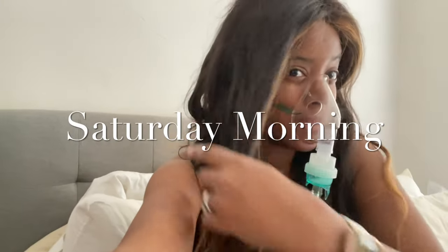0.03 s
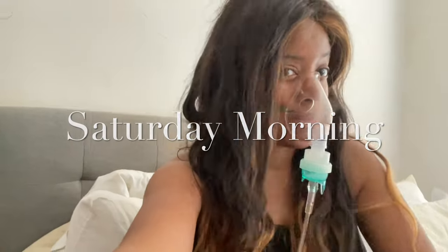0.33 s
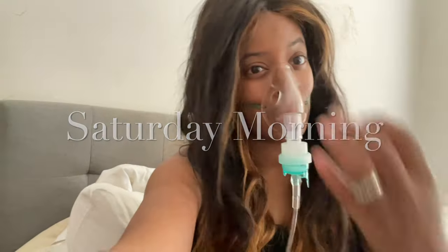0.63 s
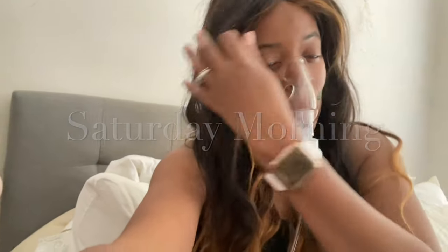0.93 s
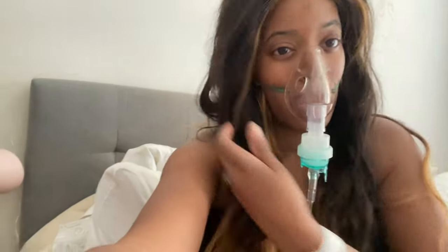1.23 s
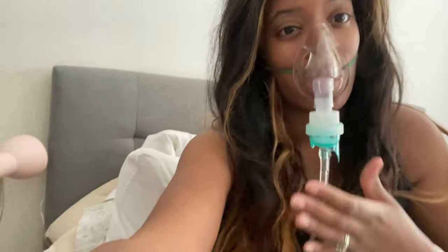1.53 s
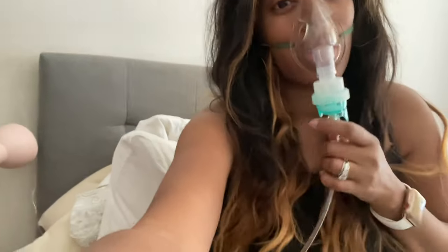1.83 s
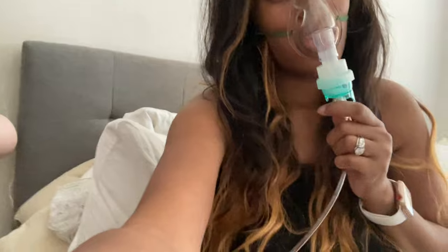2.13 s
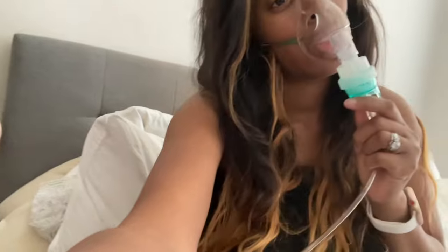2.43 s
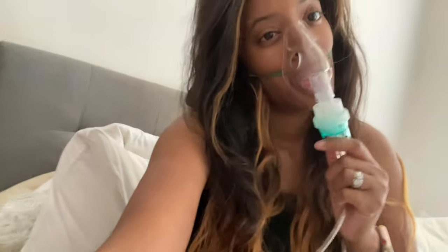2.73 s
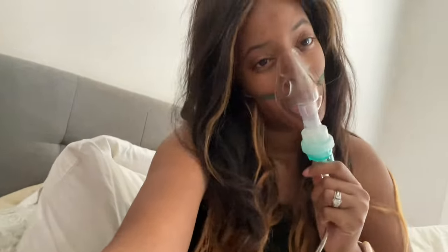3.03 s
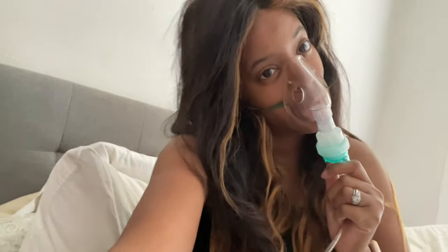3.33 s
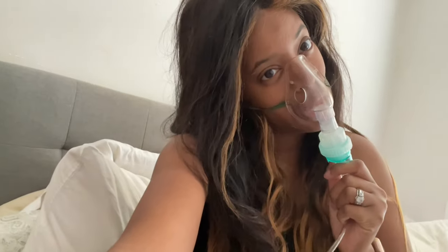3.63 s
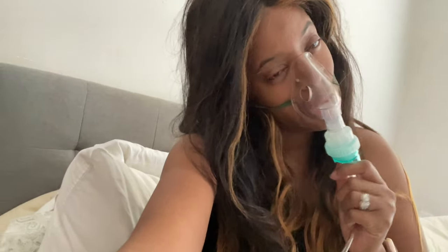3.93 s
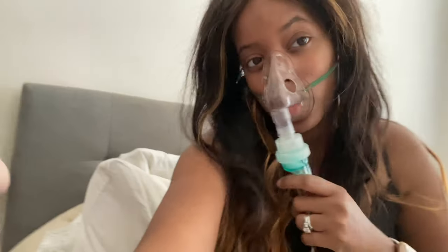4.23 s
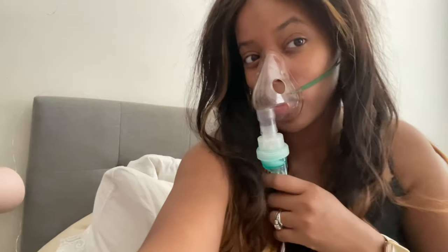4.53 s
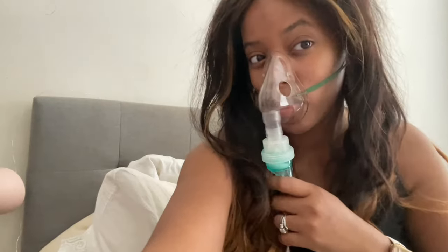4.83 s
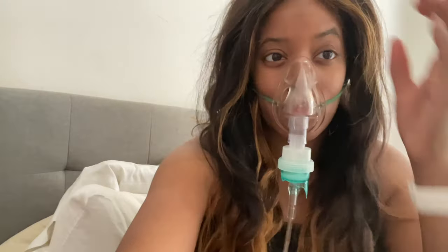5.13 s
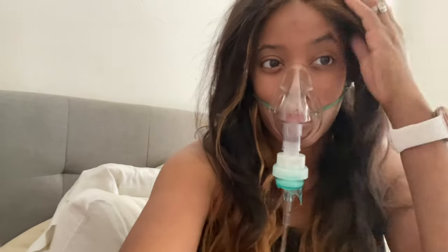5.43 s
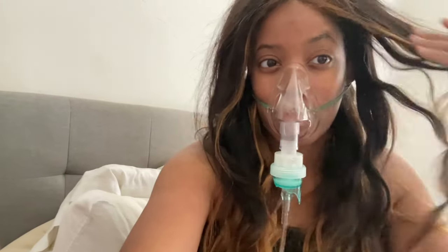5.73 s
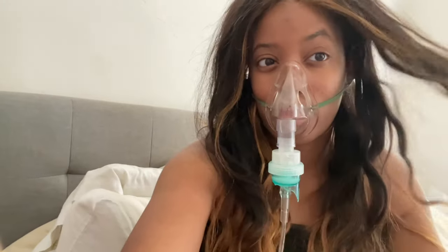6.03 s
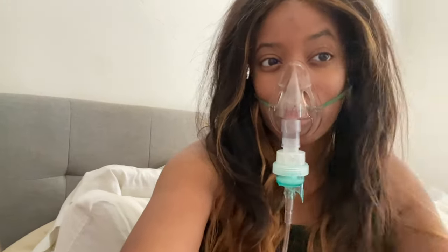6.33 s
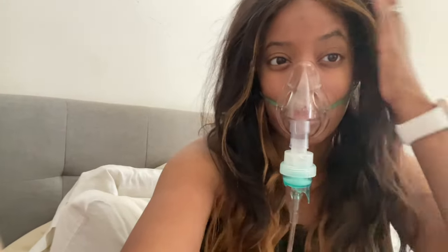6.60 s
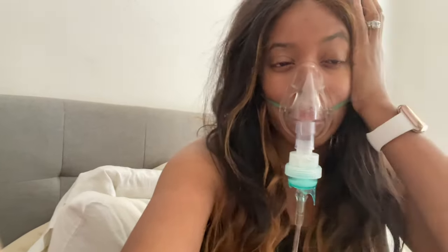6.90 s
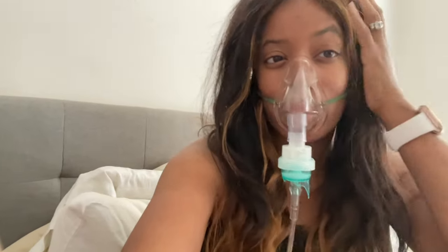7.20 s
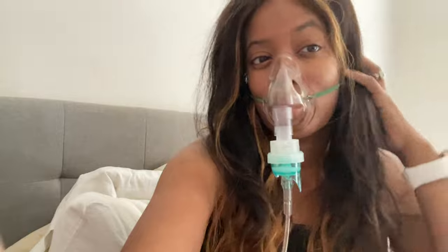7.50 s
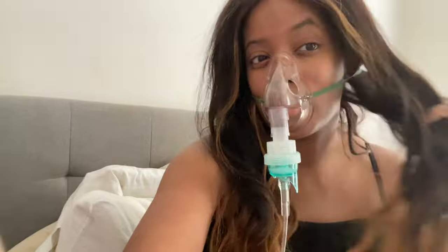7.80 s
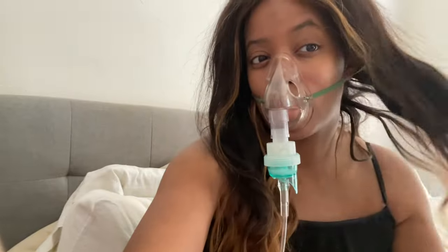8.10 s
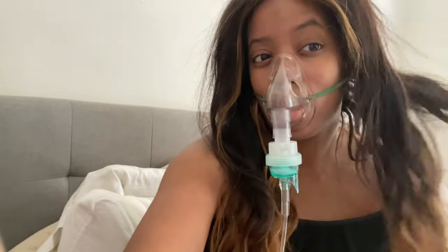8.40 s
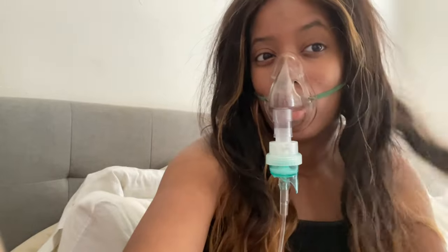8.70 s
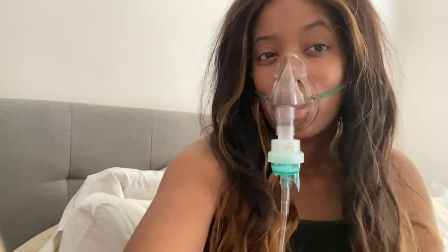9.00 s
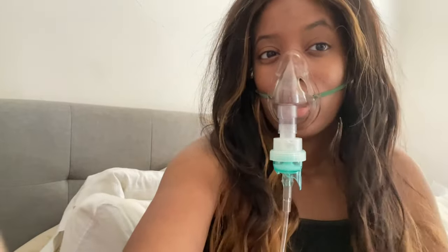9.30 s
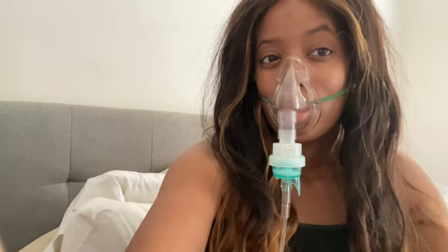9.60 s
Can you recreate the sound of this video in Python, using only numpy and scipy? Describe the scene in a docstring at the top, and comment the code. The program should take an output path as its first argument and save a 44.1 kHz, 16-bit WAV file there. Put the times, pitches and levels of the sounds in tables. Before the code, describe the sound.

Close up in a quiet bedroom, a nebulizer compressor hums with a rapid beat, topped by a high, fluttering whistle and a fine hiss of mist. The hiss swells as the medicine cup is gripped and tilted, and the liquid gives three short sputters. After a split-second drop in level midway, the sound returns with a slightly different colour, and the finest sizzle gradually softens while the motor keeps running.

```python
"""In a quiet bedroom a nebulizer runs. Its piston compressor drones and beats against the mains hum,
and its air whistles in a warble once a stroke. The pulsing jet hisses through the medicine cup under
the mask, tearing liquid into spray; the cup resonates louder and lower while it is held and tilted,
and sputters three times. A phone with two microphone ports is held close by; halfway through, the
level dips briefly, and the machine is then heard from a new position."""
import sys
import numpy as np
from scipy import signal
from scipy.fft import rfft, irfft, next_fast_len
from scipy.io import wavfile
from scipy.ndimage import uniform_filter1d, map_coordinates

SR = 44100
rng = np.random.default_rng(int(sys.argv[2]) if len(sys.argv) > 2 else 0)


def output_pcm(signal):
    """Save a mono or channel-first signal as 16-bit PCM at the path in sys.argv[1].

    Samples are clipped to [-1, 1] before scaling.
    """
    pcm = np.clip(np.atleast_2d(signal).T, -1, 1) * 32767
    wavfile.write(sys.argv[1], SR, np.round(pcm).astype(np.int16))


N = 429975
FRAME, HOP = 1024, 512
TIME = np.arange(N) / SR
FRAME_TIME = np.arange(N // HOP + 2) * HOP / SR
FRAME_HZ = np.arange(FRAME // 2 + 1)[:, None] * SR / FRAME
STROKE_HZ, MAINS_HZ = 54.39, 60
GRASP_S, DIP_S = 1.81, 5.089


def from_db(db):
    """Amplitude ratio of a level in decibels."""
    return 10 ** (np.asarray(db) / 20)

def in_time(rows, time=TIME):
    """Linear interpolation of each column against the first, t/s."""
    times, *columns = np.transpose(rows)
    return [np.interp(time, times, column) for column in columns]

def at_hz(points, hz):
    """Interpolation of a spectrum on a logarithmic frequency axis."""
    known_hz, values = np.transpose(points)
    return np.interp(np.log(np.maximum(hz, 1)), np.log(known_hz), values)

def drift(rate):
    """Smooth random fluctuation of about unit spread, with `rate` new values a second."""
    return map_coordinates(rng.standard_normal(4096), [TIME * rate], order=2, mode="wrap")

def swell(t, spread):
    """Gaussian envelope of height 1, centred on t."""
    return np.exp(-np.minimum(((TIME - t) / spread) ** 2 / 2, 50))

def surge(turns, peak_at, sharpness):
    """Amplitude modulation of rms 1, peaking at a given fraction of each stroke."""
    power = np.exp(sharpness * np.cos(2 * np.pi * (turns - peak_at)))
    return np.sqrt(power / power.mean())

def resonances(modes):
    """Response of modes (f/Hz, width/Hz, level/dB) that add in power."""
    return np.sqrt(sum(from_db(db) ** 2 / (1 + 2 * ((FRAME_HZ - hz) / width) ** 2) ** 2
                       for hz, width, db in modes))

# Coherence of the sound field at the two ports: f/Hz, correlation (0-1)
COHERENCE = [(100, 0.75), (280, 0.66), (430, 0.21), (680, 0.82), (950, 0.81), (2200, 0.56), (3400, 0.52),
             (5000, 0.61), (7000, 0.9), (9400, 1), (11400, 1), (15500, 1)]
def turbulence(gain):
    """Partially coherent stereo noise of rms 1, filtered by a gain over frequency and frames."""
    mid, side = rng.standard_normal((2, len(FRAME_HZ), 2 * len(FRAME_TIME))).view(complex)
    alike = np.clip(at_hz(COHERENCE, FRAME_HZ), -1, 1)
    mid, side = gain * np.sqrt(1 + alike) * mid, gain * np.sqrt(1 - alike) * side
    grains = irfft(np.array([(mid + side).T, (mid - side).T])) * signal.get_window("cosine", FRAME)
    noise = (grains[:, 1:, :HOP] + grains[:, :-1, HOP:]).reshape(2, -1)[:, :N]
    return noise / np.std(noise)

def noise_band(hz, width_hz):
    """Random excitation of a single resonance; rms 1."""
    return turbulence(resonances([(hz, width_hz, 0)]))

# Lean of head and cup: t/s, tilt (0-1)
CUP_TILT = [(1.8, 0), (2.5, 0.76), (3.3, 0.93), (4.0, 0.81), (4.4, 0.49), (5.05, 0.31), (5.13, 0.02)]
def posture(time=TIME):
    """Source geometry, each 0-1: the cup is tilted, is held, hangs free in its new position."""
    tilt, = in_time(CUP_TILT, time)
    grasped = np.clip((time - GRASP_S) / 0.4, 0, 1)
    moved = np.clip((time - DIP_S) / 0.02, 0, 1)
    return tilt, grasped * (1 - moved), moved


# Piston harmonics: f/STROKE_HZ, level/dB
PISTON_HARMONICS = [(2, -41.5), (3, -46), (4, -56), (5, -68), (6, -62.5), (7, -62), (8, -62), (9, -70),
                    (10, -66), (11, -63), (12, -60.5), (13, -58.5)]
# Magnetic hum of the motor: f/MAINS_HZ, level/dB
HUM_HARMONICS = [(2, -42), (4, -59.5)]
def compressor(turns):
    """Beats: the motor slips behind the mains, so piston harmonic 2 beats with the hum at 11 Hz."""
    tilt, _, _ = posture()
    lean_db = 4 * tilt
    thump = -from_db(-48.5 + lean_db) * np.cos(2 * np.pi * turns)
    piston = sum(from_db(db) * np.sin(2 * np.pi * (k * turns + rng.random()))
                 for k, db in PISTON_HARMONICS)
    hum = sum(from_db(db) * np.cos(2 * np.pi * k * MAINS_HZ * TIME) for k, db in HUM_HARMONICS)
    nearness = from_db(0.31 * (lean_db - np.median(lean_db)) + 0.26 * drift(11))
    return np.sqrt(2) * (thump + (piston + hum) * nearness)

# Casing resonances: f/Hz, width/Hz, relative level/dB
CASING_MODES = [(672, 50, 1), (754, 64, -6.5)]
# Casing vibration: t/s, relative level/dB
CASING_ENVELOPE = [(0.1, -43), (1.0, -46), (1.5, -40), (2.1, -44), (3.4, -43), (4.0, -42.5), (4.7, -39),
                   (5.3, -42.5), (6.1, -37.5), (6.6, -39.5), (7.7, -37), (8.6, -39), (9.1, -36.5),
                   (9.7, -39.5)]
def casing(mode_hz=658, waver_hz=8):
    """Forced vibration: the shaken plastic drones in one narrow, wavering mode over a broader boom."""
    phase = 2 * np.pi * np.cumsum(mode_hz + waver_hz * drift(45)) / SR
    mode = np.sqrt(2) * from_db(-6.5 + 3 * drift(22)) * np.cos(phase)
    boom = from_db(-2.5) * turbulence(resonances(CASING_MODES))
    _, _, moved = posture()
    focus = from_db(0.96 * moved)  # the mode stands out more in the new position
    return from_db(in_time(CASING_ENVELOPE)[0]) * (mode * focus + boom / focus)

# Lower pitch of the whistle: t/s, f/Hz
LOW_PITCH = [(0.1, 1997), (1.1, 1899), (1.6, 1984), (1.9, 1923), (2.4, 2038), (3.9, 2012), (4.4, 1958),
             (5.9, 1933), (6.7, 1816), (8.2, 1821), (8.6, 1892), (9.7, 1830)]
def whistle_regimes(time=TIME):
    """Two regimes of oscillation: lower pitch, upper pitch, and the tonal share of their power."""
    tilt, _, moved = posture(time)
    low_hz, = in_time(LOW_PITCH, time)
    high_hz = 2230 - 20 * tilt + 109.5 * moved
    return low_hz, high_hz, 0.87 + 0.03 * tilt

# Whistle at low flow and at high flow: t/s, relative level/dB
LOW_FLOW = [(0.02, -37), (0.17, -32.5), (0.5, -40.5), (0.85, -37), (1.03, -34.5), (1.2, -40), (1.48, -40),
            (1.6, -35.5), (1.73, -43), (1.92, -32.5), (2.12, -38.5), (2.3, -34), (2.6, -36.5),
            (3.89, -37.5), (4.2, -39), (4.6, -40.5), (4.73, -48), (4.84, -36), (5.08, -43), (5.13, -35.5),
            (5.9, -34), (6.5, -37.5), (8.15, -40), (8.45, -40.5), (9.25, -42.5), (9.65, -38)]
HIGH_FLOW = [(0.05, -44), (0.48, -37.5), (1.39, -45), (4.05, -38), (4.19, -44.5), (5.02, -42), (5.08, -41),
             (5.16, -37), (8.17, -40.5), (9.65, -39), (9.7, -41)]
def whistle(turns, valve_at=0.31, drop_at=0.69, shut_turns=0.029):
    """Flow-driven tone: each stroke it sags with the flow, drops to a low chirp and is valved off."""
    low_hz, high_hz, tonal = whistle_regimes()
    _, _, moved = posture()
    part = (turns - valve_at) % 1  # fraction of a turn since the valve shut
    sag_hz = 260.5 * (1 - 0.5 * moved)
    upper_hz = high_hz + sag_hz * (0.5 - part)
    high = (1 + np.tanh(7 * (drop_at - part + 0.13 * drift(130)))) / 2  # 1 on the upper pitch
    hz = low_hz + (upper_hz - low_hz) * high + 38 * drift(60) + 55 * drift(700)
    low_db = in_time(LOW_FLOW)[0] + 3.15 + 1.5 * drift(45)
    high_db = in_time(HIGH_FLOW)[0] + 1.5
    level_db = low_db * (1 - high) + high_db * high + 0.5 * drift(290)
    opening = 1 - np.exp(-(np.minimum(part, 1 - part) / shut_turns) ** 2)
    strength = uniform_filter1d(from_db(level_db) * opening, size=44)
    return np.sqrt(2 * tonal) * strength * np.sin(2 * np.pi * np.cumsum(hz) / SR)

def rasp(turns):
    """Narrow-band noise: what the whistle loses in clear tone is hoarseness at its two pitches."""
    low_hz, high_hz, _ = whistle_regimes(FRAME_TIME)
    _, _, tonal = whistle_regimes()
    low = noise_band(low_hz, width_hz=170) * surge(turns, peak_at=0.24, sharpness=1.0)
    high = noise_band(high_hz, width_hz=330) * surge(turns, peak_at=0.17, sharpness=0.067)
    low_db, high_db = in_time(LOW_FLOW)[0] + 2.5, in_time(HIGH_FLOW)[0] + 5.5
    return np.sqrt(1 - tonal) * (from_db(low_db) * low + from_db(high_db) * high)

# Hollow tone, strongest in the new position: t/s, level/dB
HOLLOW_ENVELOPE = [(0.1, -49), (1.1, -45), (2.2, -54), (5.08, -54), (5.15, -44), (7.1, -43), (7.4, -40.5),
                   (8.15, -41.5), (8.45, -50), (9.7, -47)]
def hollow_tone(centre_hz=1805, flutter_db=3.5):
    """Random modulation of frequency and amplitude: a wavering tone just below the whistle."""
    hz = centre_hz + 38 * drift(80) + 60 * drift(600)
    level_db = in_time(HOLLOW_ENVELOPE)[0] + flutter_db * drift(90)
    return np.sqrt(2) * from_db(level_db) * np.sin(2 * np.pi * np.cumsum(hz) / SR)

# Resonances of the air tube: f/Hz, width/Hz, relative level/dB
TUBE_MODES = [(2536, 200, -6.5), (2956, 81, 0.5), (3140, 13, -18), (3180, 410, -13)]
# Ringing of the tube: t/s, relative level/dB
TUBE_ENVELOPE = [(0.1, -48), (1.3, -49), (1.55, -51.5), (2.1, -49.5), (2.35, -52.5), (2.95, -45),
                 (3.2, -44.5), (3.67, -40), (4.15, -43.5), (5.05, -47.5), (5.2, -42.5), (5.8, -47),
                 (6.45, -43.5), (7.0, -46), (9.7, -45)]
def air_line(turns, flutter_db=2.5):
    """Pipe resonance: each stroke sucks a puff through the intake; the delivery rings the tube."""
    puff = noise_band(1500, width_hz=480) * surge(turns, peak_at=0.3, sharpness=0.56)
    tube_db = in_time(TUBE_ENVELOPE)[0] + 0.65 + flutter_db * drift(24)
    tube = turbulence(resonances(TUBE_MODES)) * surge(turns, peak_at=0.33, sharpness=0.19)
    return from_db(-46.5) * puff + from_db(tube_db) * tube

# Lowest resonance f0 of the cup, which falls as it is gripped and tilted: t/s, f/Hz
CUP_FUNDAMENTAL = [(1.3, 5320), (1.75, 5230), (2.05, 5160), (2.38, 5160), (2.48, 5080), (4.15, 5094),
                   (4.4, 5155), (5.06, 5240), (5.12, 5320), (8.35, 5323), (8.9, 5510), (9.4, 5630),
                   (9.7, 5570)]
# That mode on its broad skirt, then its overtone: f/f0, width/Hz, relative level/dB
CUP_MODE = [(1.0, 186, -0.5), (0.95, 440, -11.5)]
OVERTONE_MODE = [(2.049, 422, 0)]
def cup_ring(sputter_sag_hz=110, flicker_db=1.85):
    """Cavity resonance: tilt broadens the cup's ring; sputters excite it and briefly lower it."""
    tilt, held, moved = posture()
    excited = sum(swell(t, spread) for t, _, spread, _ in SPUTTER_EVENTS)
    ring_db = -48.98 + 8.5 * held + 3.5 * tilt + 4 * excited
    ring_db += moved * (3.5 - 0.5 * (TIME - DIP_S))  # slow fade in the new position
    spray_db, _ = mist_levels()
    overtone_db = spray_db - 13.98 + 11.5 * held  # the spray excites the overtone
    sag = np.interp(FRAME_TIME, TIME, sum(swell(t, 0.033) for t, *_ in SPUTTER_EVENTS))
    cup_hz = in_time(CUP_FUNDAMENTAL, FRAME_TIME)[0] - sputter_sag_hz * sag
    broadening = 1 + 0.12 * posture(FRAME_TIME)[0] ** 2
    ring = 0
    for modes, level_db in ((CUP_MODE, ring_db), (OVERTONE_MODE, overtone_db)):
        response = resonances([(k * cup_hz, width * broadening, db) for k, width, db in modes])
        ring += from_db(level_db + flicker_db * drift(40)) * turbulence(response)
    return ring

# Second resonance of the cup: t/s, f/Hz, level/dB
SECOND_MODE = [(0.1, 6020, -52), (1.8, 5750, -50.5), (2.45, 6200, -47), (2.75, 6300, -50),
               (3.1, 6100, -43.5), (3.6, 6100, -44), (4.1, 6030, -41), (5.05, 5940, -42.5),
               (5.15, 5900, -48), (6.3, 5820, -47), (6.9, 5853, -42), (7.6, 5770, -53.5), (9.7, 5850, -60)]
def second_ring(wander_hz):
    """Noise-driven resonance: a narrow, gliding band above the cup's lowest mode."""
    hz, _ = in_time(SECOND_MODE, FRAME_TIME)
    _, level_db = in_time(SECOND_MODE)
    return from_db(level_db) * noise_band(hz + wander_hz, width_hz=190)

# Centre fc of the jet's hiss: t/s, f/Hz
JET_CENTRE = [(0.3, 7240), (1.3, 6950), (3.3, 7000), (8.0, 6990), (8.8, 7020)]
# Its twin peaks: f/fc, width/Hz, relative level/dB
JET_PEAKS = [(0.966, 316, -0.5), (1.026, 292, 0.5)]
def jet(wander_hz, fade_db_per_s=0.9):
    """Turbulent jet noise: louder while the cup is held, slowly fading in the new position."""
    _, held, moved = posture()
    level_db = -48.5 + 4.5 * held + moved * (7 - fade_db_per_s * (TIME - DIP_S))
    centre_hz, = in_time(JET_CENTRE, FRAME_TIME)
    peaks = [(k * centre_hz + wander_hz, width, db) for k, width, db in JET_PEAKS]
    return from_db(level_db) * turbulence(resonances(peaks))

# Upper resonances of the mask: f/Hz, width/Hz, relative level/dB
MASK_MODES = [(8660, 320, 0), (10050, 240, -6)]
def mask_ring(held_drop_hz=620):
    """Higher modes: the mask rings lower and louder when held, louder still in the new position."""
    _, held, moved = posture()
    drop_hz = held_drop_hz * posture(FRAME_TIME)[1]
    modes = [(hz - drop_hz, width, db) for hz, width, db in MASK_MODES]
    return from_db(-58 + 4 * held + 7 * moved) * turbulence(resonances(modes))

def cup_hiss(turns):
    """Pulsating flow: the hiss through cup and mask swells with each delivery of air."""
    wander_hz = 35 * np.interp(FRAME_TIME, TIME, drift(6.4))
    hiss = cup_ring() + second_ring(wander_hz) + jet(wander_hz) + mask_ring()
    return hiss * surge(turns, peak_at=0.58, sharpness=0.23)

# Cooling air and bedroom background: f/Hz, relative spectrum level/dB
AIR_SPECTRUM = [(20, -36), (38, -1), (70, -10), (100, -1), (150, -5.5), (215, 2.5), (300, -5), (450, -6),
                (580, -0.5), (950, -16.5), (1400, -11), (3500, -18.5), (4200, -20.5), (6000, -13),
                (16000, -26.5)]
def cooling_air(level_db=-44):
    """Broadband flow noise: a steady rush, strongest in the bass."""
    return from_db(level_db) * turbulence(from_db(at_hz(AIR_SPECTRUM, FRAME_HZ)))

# Notch in the spray, moving with the head: t/s, f/Hz, depth/dB
SPRAY_NOTCH = [(.35, 13500, -1), (.6, 14050, 8), (.85, 13100, 17), (1.3, 13000, 6), (1.7, 13500, 6),
               (2.0, 14000, 29), (2.35, 14240, 4), (2.6, 14200, 8), (3.9, 14300, 2), (4.4, 14400, 10),
               (5.05, 14700, 5), (5.12, 13400, 7), (9.7, 12800, 6)]
def mask_interference(width_hz=260, path_s=0.0011, sway_s=0.00004):
    """Interference: reflections off mask and face notch and ripple the treble as the head sways."""
    hz, depth_db = in_time(SPRAY_NOTCH, FRAME_TIME)
    notch = from_db(-depth_db / (1 + ((FRAME_HZ - hz) / width_hz) ** 2))
    delay = path_s + sway_s * np.interp(FRAME_TIME, TIME, drift(2.0))
    return notch * np.abs(1 + 0.25 * np.exp(2j * np.pi * FRAME_HZ * delay))

# Treble spray, and the sizzle above it: t/s, relative level/dB
SPRAY_ENVELOPE = [(0.02, -34.5), (0.31, -36), (0.75, -42), (1.82, -43), (1.97, -33), (2.2, -34),
                  (2.44, -43.5), (3.5, -35.5), (3.69, -38.5), (4.93, -38), (5.14, -46.5), (6.95, -45.5),
                  (7.7, -52), (9.27, -48), (9.7, -54)]
SIZZLE_ENVELOPE = [(0.02, -36), (0.42, -31), (0.56, -44), (2.96, -43.5), (3.17, -32), (4.09, -38.5),
                   (4.36, -30.5), (5.03, -31.5), (5.12, -39), (5.3, -38.5), (7.27, -40.5), (7.73, -47),
                   (9.48, -45.5), (9.7, -48.5)]
def mist_levels(choke_db=6):
    """Interrupted flow: each sputter chokes the levels of spray and sizzle for a moment."""
    loss_db = choke_db * sum(swell(t + spread, 0.027) for t, _, spread, _ in SPUTTER_EVENTS)
    return in_time(SPRAY_ENVELOPE)[0] + 4 - loss_db, in_time(SIZZLE_ENVELOPE)[0] + 2.2 - loss_db

# Resonances that glide as the cup is moved: t/s, spray f/Hz, sizzle f/Hz
MIST_CENTRES = [(0.05, 12670, 15500), (0.5, 12620, 15720), (0.95, 12700, 15820), (1.5, 12900, 15200),
                (1.9, 12690, 15200), (2.3, 13300, 15200), (2.5, 13180, 15200), (3.05, 13700, 14600),
                (3.7, 13000, 14500), (4.1, 12850, 14900), (4.4, 12810, 15230), (5.06, 12950, 15300),
                (5.12, 12660, 15500), (6.6, 12660, 15510), (7.5, 12570, 15300)]
# Stationary resonances of the spray: f/Hz, width/Hz, relative level/dB
SPRAY_MODES = [(13900, 600, 7.5), (10700, 170, -23), (13500, 12400, -14)]
def nozzle(turns, feed_db=1.66, droplet_db=1.3):
    """Atomization: liquid is drawn up unevenly and torn into droplets, a very high, grainy sizzle."""
    tilt, _, _ = posture(FRAME_TIME)
    spray_db, sizzle_db = mist_levels()
    spray_hz, sizzle_hz = in_time(MIST_CENTRES, FRAME_TIME)
    shadow = mask_interference()
    spray_colour = shadow * resonances([(spray_hz, 380 + 300 * tilt, 13.5), *SPRAY_MODES])
    sizzle_colour = shadow * resonances([(sizzle_hz, 560, 0)])
    spray = from_db(spray_db + droplet_db * drift(450)) * turbulence(spray_colour)
    sizzle = from_db(sizzle_db + droplet_db * drift(300)) * turbulence(sizzle_colour)
    feed = surge(turns, peak_at=0.98, sharpness=0.43) * from_db(feed_db * drift(28))
    return (spray + sizzle) * feed

# Reflections from wall and headboard: delay/s, level/dB
REFLECTIONS = [(.0093, -12.5), (0.016, -16.5), (0.0222, -20.5)]
def bedroom(direct):
    """Comb filtering: a few weak early reflections ripple the spectrum."""
    return direct + sum(from_db(db) * np.roll(direct, round(delay * SR), axis=-1)
                        for delay, db in REFLECTIONS)

# Small stray noises: t/s, level/dB, spread/s, f/Hz, width/Hz
STRAY_EVENTS = [(0.5, -51, 0.35, 2830, 470), (0.586, -39, 0.009, 11500, 2000),
                (0.601, -36.5, 0.004, 5050, 220), (0.61, -41, 0.05, 5900, 1000),
                (1.17, -43, 0.27, 1800, 720), (1.24, -45, 0.08, 6700, 250),
                (1.256, -38.5, 0.019, 2580, 150), (1.35, -46.5, 0.07, 2630, 220),
                (9.2, -44.5, 0.014, 800, 820)]
def stray_noises():
    """Band-limited noise bursts: a faint rasp, a tick, short chirps, soft rustles and a tap."""
    return sum(from_db(db) * swell(t, spread) * noise_band(hz, width)
               for t, db, spread, hz, width in STRAY_EVENTS)

# Sputters of liquid in the cup: t/s, level/dB, spread/s, starting f/Hz
SPUTTER_EVENTS = [(3.642, -32.5, 0.014, 6700), (3.884, -31.5, 0.017, 6700), (4.12, -39, 0.037, 5130)]
def sputters(end_hz=5100):
    """Swept noise transients: each sputter is a short swish that falls in pitch."""
    glide = []
    for t, _, spread, start_hz in SPUTTER_EVENTS:
        glide += [(t - 0.52 * spread, start_hz), (t + spread, end_hz)]
    centre_hz, = in_time(glide, FRAME_TIME)
    envelope = sum(from_db(db) * swell(t, spread) for t, db, spread, _ in SPUTTER_EVENTS)
    return envelope * noise_band(centre_hz, width_hz=950)

# Soft bumps of the hand: t/s, level/dB, spread/s
BUMP_EVENTS = [(5.52, -49, .025), (5.63, -52.5, 0.048), (8.17, -53.5, .06)]
def bumps(band_hz=(34, 70)):
    """Structure-borne sound: the grip shifts on the phone with dull thuds."""
    bandpass = signal.butter(2, band_hz, "band", fs=SR, output="sos")
    rumble = signal.sosfilt(bandpass, rng.standard_normal(N))
    envelope = sum(from_db(db) * swell(t, spread) for t, db, spread in BUMP_EVENTS)
    return envelope * rumble / np.std(rumble)


def scene():
    """Superposition of the sources; one crankshaft times the drone, the whistle and the jet's pulse."""
    turns = STROKE_HZ * TIME + 0.0049 * drift(6)
    motor = compressor(turns) + casing()
    airflow = whistle(turns) + rasp(turns) + hollow_tone() + air_line(turns)
    hiss = cup_hiss(turns) + sputters()
    return motor + bedroom(airflow + hiss) + cooling_air() + nozzle(turns) + bumps() + stray_noises()

# Left port relative to right: f/Hz, level/dB
PORT_BALANCE = [(54, 6), (108, 1), (120, 2.4), (163, 3.4), (310, .8), (440, 6), (680, 3.5), (1350, 5),
                (1900, 2.7), (2350, .5), (2970, 4.5), (4400, .5), (8000, 0)]
# Lead of the left port: f/Hz, phase/rad
PORT_LEAD = [(54, .1), (110, .5), (163, 0), (220, .55), (440, 1.2), (680, .2), (1350, .1), (1900, -.45),
             (2400, .45), (3600, -.3), (5000, .15), (8200, -.1), (9400, -1.5), (10700, -3), (12300, -3.25),
             (13800, -4.7), (14800, -6.1), (16000, -6.3)]
def record(dry, dip_half_s=0.034, dip_floor_db=-26, low_cut_hz=32, high_cut_hz=15760):
    """Spaced receivers: two band-limited ports differ in level and phase; the level dips briefly."""
    size = next_fast_len(N + FRAME)
    hz = np.arange(size // 2 + 1) * SR / size
    left = from_db(at_hz(PORT_BALANCE, hz) / 2) * np.exp(1j * at_hz(PORT_LEAD, hz) / 2)
    heard = irfft(rfft(dry, size) * np.array([left, 1 / left]), size)[:, :N]
    dip = np.clip(np.abs(TIME - DIP_S) / dip_half_s, from_db(dip_floor_db), 1)
    heard = signal.sosfilt(signal.butter(4, low_cut_hz, "high", fs=SR, output="sos"), heard * dip)
    return signal.sosfilt(signal.ellip(12, 0.1, 80, high_cut_hz, fs=SR, output="sos"), heard)


dry = scene()
out = record(dry)
output_pcm(out)
```